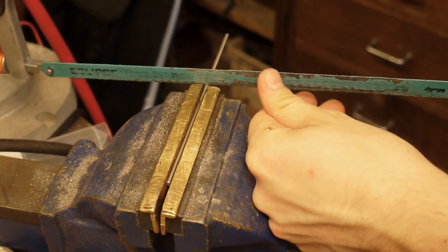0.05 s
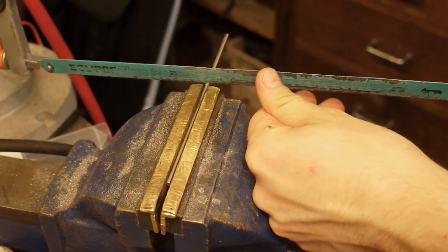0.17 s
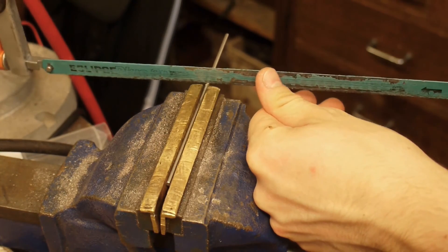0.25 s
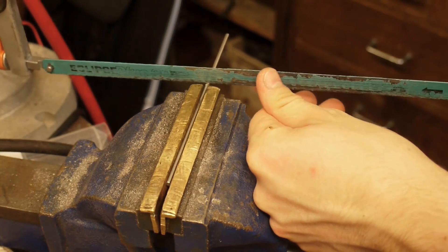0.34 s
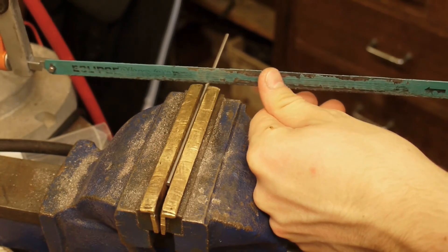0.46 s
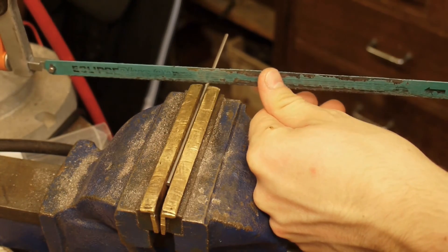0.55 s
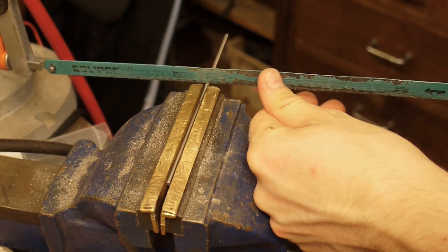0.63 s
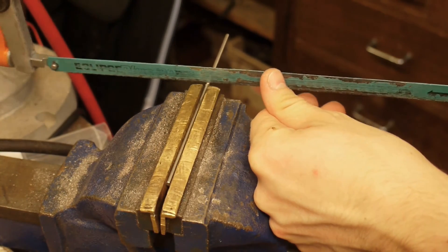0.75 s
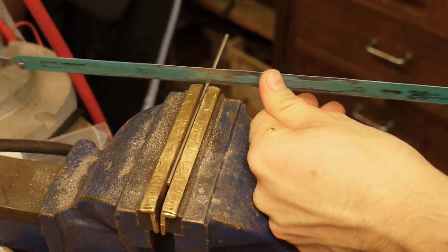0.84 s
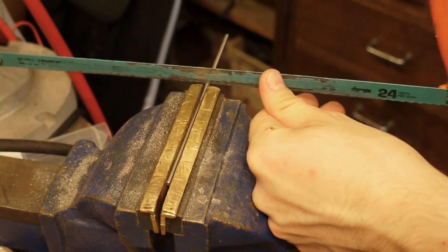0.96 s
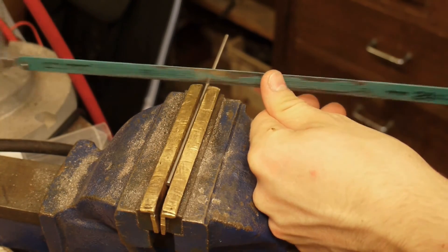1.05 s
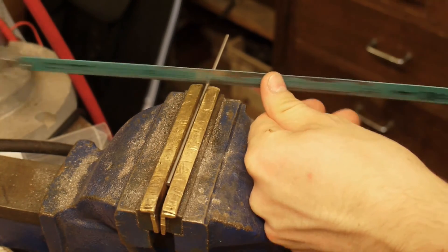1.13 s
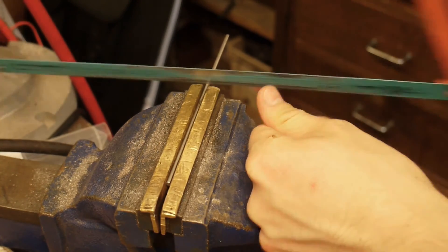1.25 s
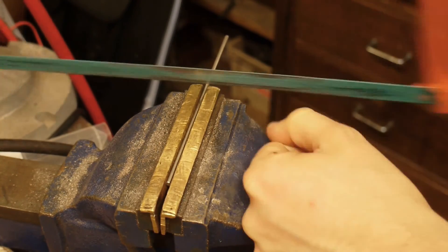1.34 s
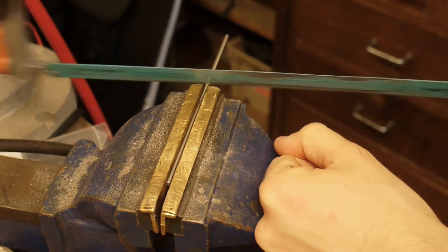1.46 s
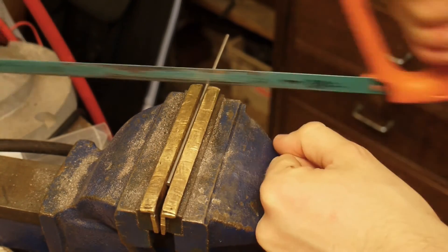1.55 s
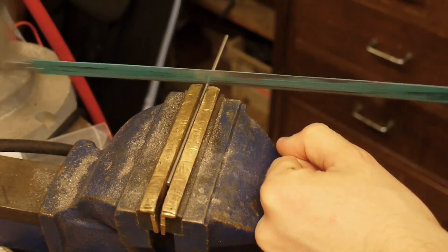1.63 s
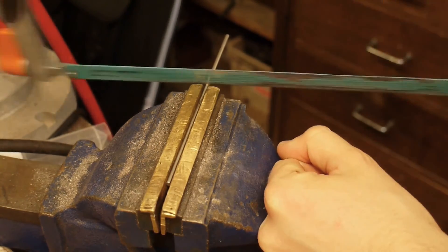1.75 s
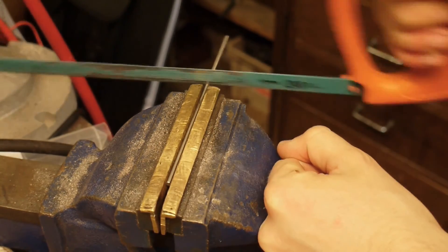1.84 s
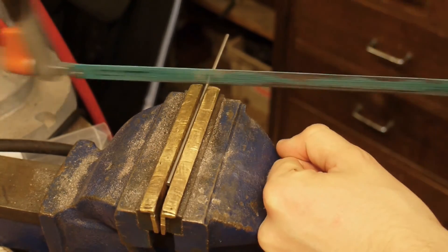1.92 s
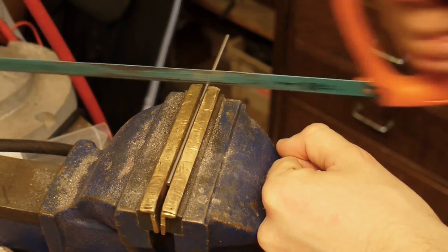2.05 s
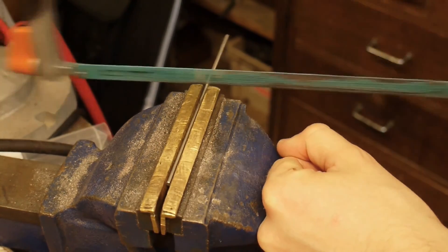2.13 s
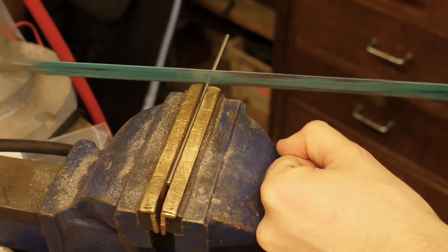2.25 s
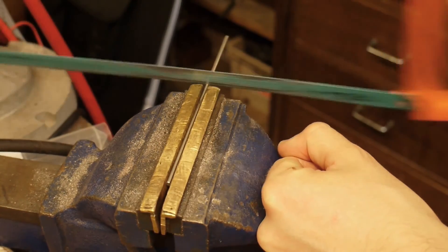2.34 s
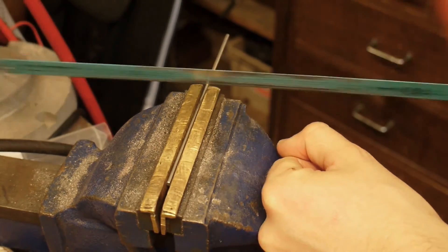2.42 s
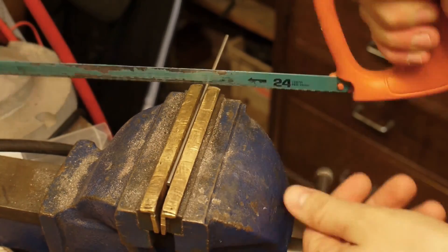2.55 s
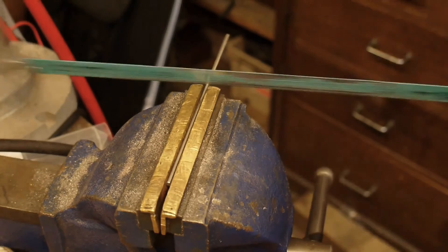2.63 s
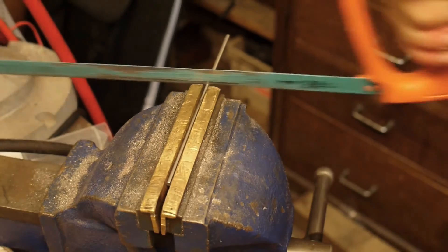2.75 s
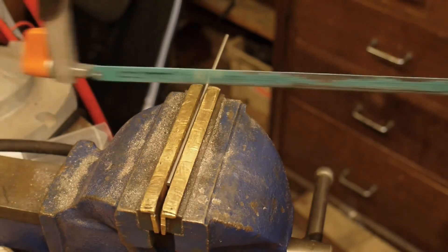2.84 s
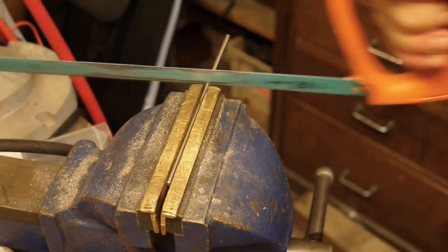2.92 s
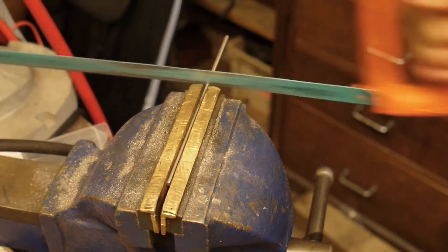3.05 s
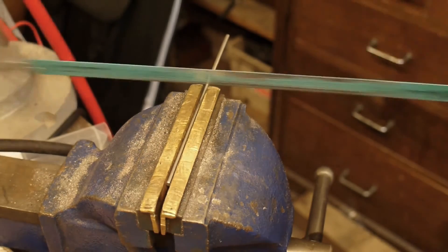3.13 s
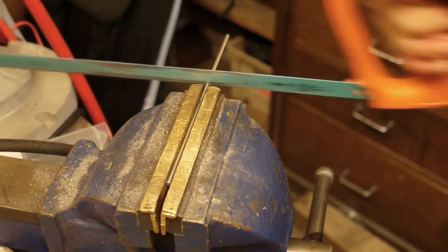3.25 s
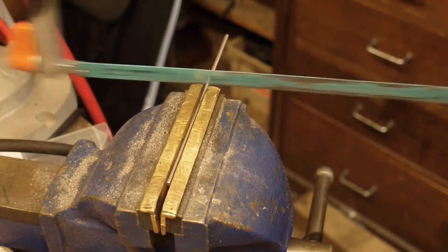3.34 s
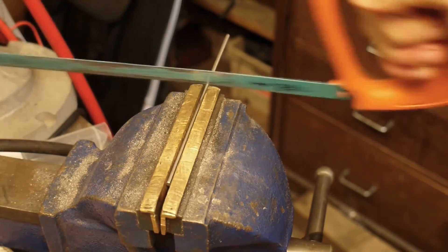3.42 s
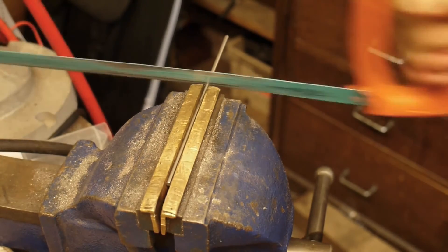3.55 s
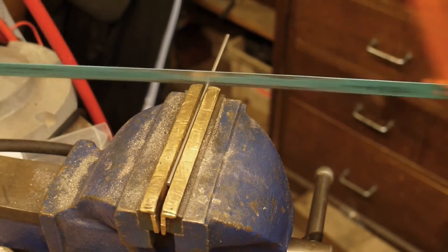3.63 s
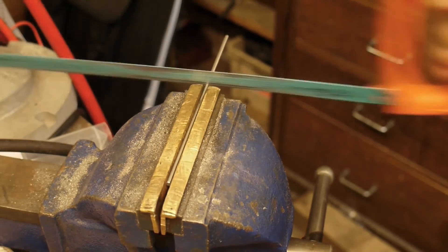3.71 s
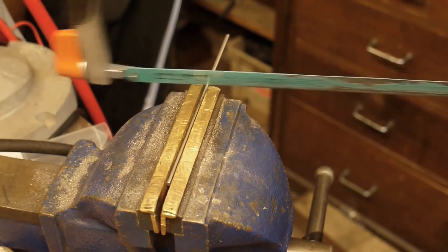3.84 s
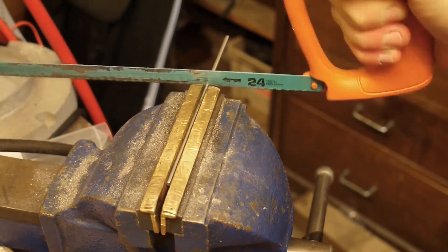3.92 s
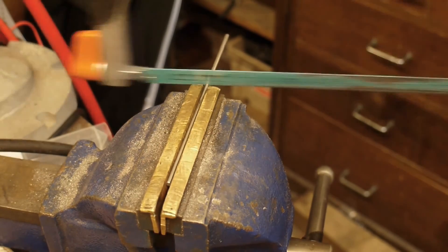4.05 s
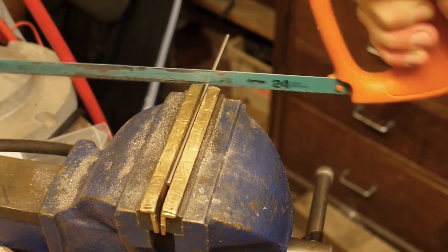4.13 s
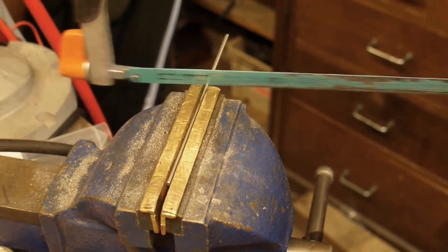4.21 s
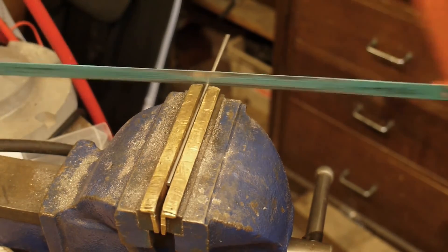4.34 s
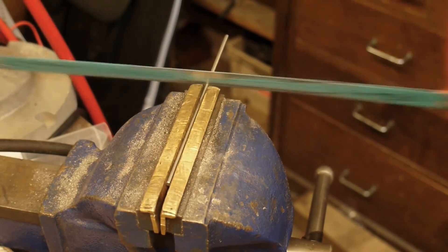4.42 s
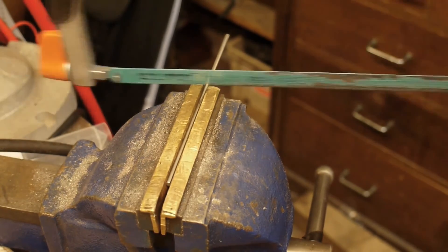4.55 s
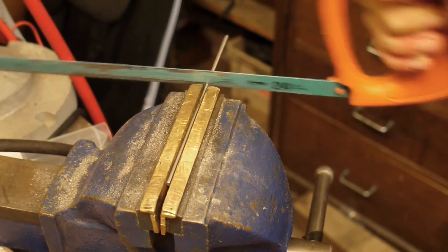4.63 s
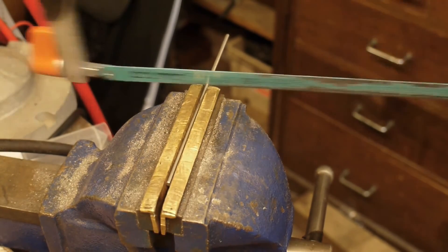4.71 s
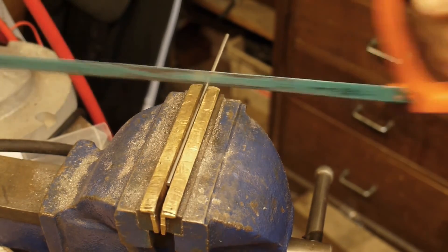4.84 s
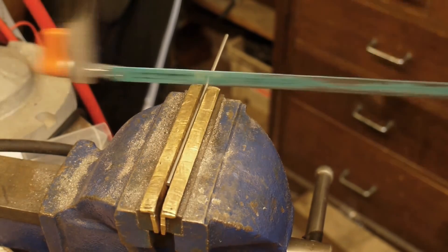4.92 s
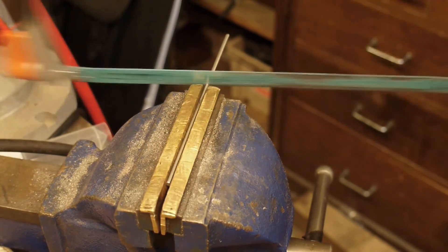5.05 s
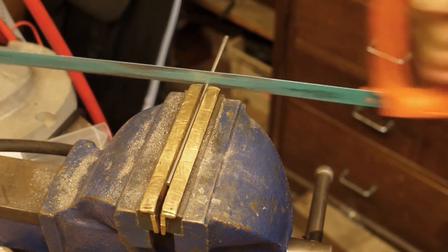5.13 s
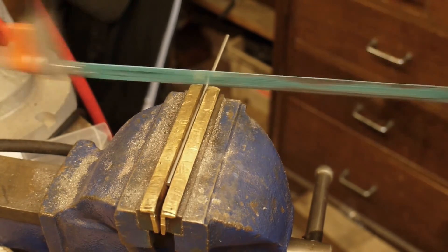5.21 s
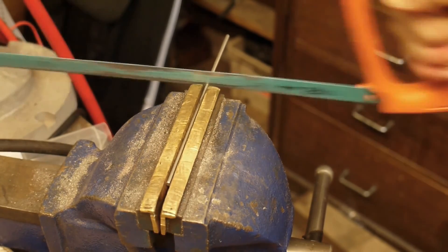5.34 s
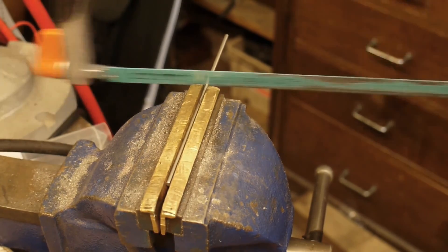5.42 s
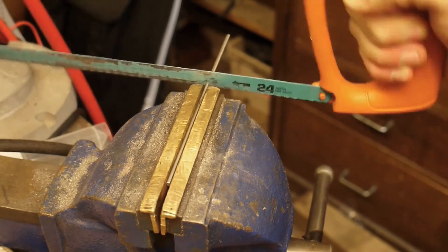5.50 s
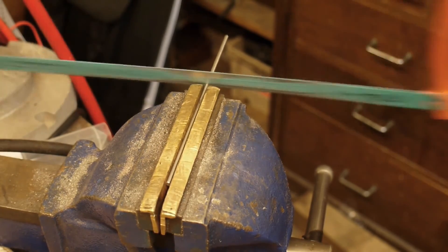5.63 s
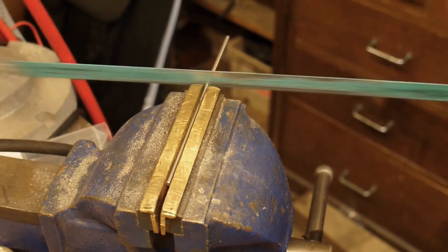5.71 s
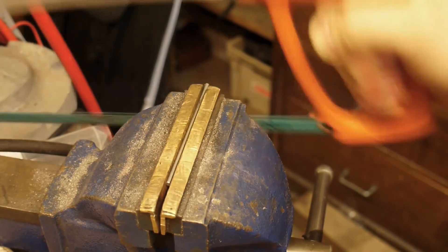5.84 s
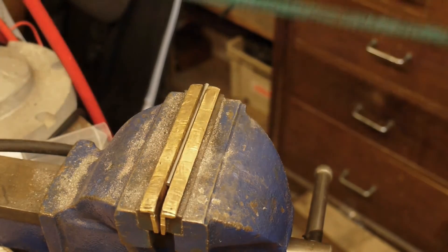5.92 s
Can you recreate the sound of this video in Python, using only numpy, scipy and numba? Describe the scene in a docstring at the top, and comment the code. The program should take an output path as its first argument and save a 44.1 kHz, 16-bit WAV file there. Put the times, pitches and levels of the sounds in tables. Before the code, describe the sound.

Metal blade clatters lightly as it is set on a clamped rod, with early hiss that stops abruptly. Tentative scrapes turn into rapid, bright sawing, longer bites alternating with lighter skims. The rod rings and squeals around the rasp, the vise thumps dully, and the saw drops with a knock. Small workshop, close microphone, nearly centred, very little reverberation.

```python
"""Clicks, then short rasping strokes, then fast sawing: a hacksaw cuts a thin clamped metal rod, heard close up.
Squeals, whines and groans come and go until the saw breaks through with a knock, over early hiss, room air and hum.
Random tooth snaps and chip scrape make a force that drives rasp, rod, blade and bench; a second, like force drives
the frame. Clicks, snags, thumps and the knock are decaying noise that sets a few modes ringing.
A small dry workshop adds short reflections."""
import sys
import numpy as np
from scipy import signal
from scipy.fft import rfft, irfft
from scipy.io import wavfile
from scipy.ndimage import uniform_filter1d, map_coordinates
from numba import njit

SR = 44100
rng = np.random.default_rng(int(sys.argv[2]) if len(sys.argv) > 2 else 0)


def file_out(sig):
    """Save sig as 16-bit WAV at sys.argv[1]."""
    # one column per channel
    cols = np.atleast_2d(sig).T
    # limit, then scale
    lim = np.clip(cols, -1, 1)
    pcm = np.round(lim * 32767).astype(np.int16)
    wavfile.write(sys.argv[1], SR, pcm)


N = 263277
T = np.arange(N) / SR  # time in seconds

# Spectrum of the early hiss. Each row: frequency in Hz, relative level in dB.
HISS_COLOUR = [(41, -44), (70, -10), (296, -5.5), (441, -6), (702, -6.5), (1200, -8), (9390, -25),
               (11200, -69), (14000, -52)]
HISS_DB, HISS_END_S = -57.5, 0.7  # the hiss stops abruptly
# Spectrum of the quiet room air. Each row: frequency in Hz, relative level in dB.
ROOM_COLOUR = [(25, 0), (100, -5.5), (180, -20), (290, -9), (1000, -20.5), (3500, -23.5), (9600, -32.5),
               (16000, -43)]
ROOM_DB = -71  # the level wanders around this
HUM_HZ, HUM_DB = 51, -67

# The blade is set down and rattles in its frame.
# Each row: start in seconds, relative level in dB, time for the driving rattle to fall 60 dB in seconds.
CLICKS = [(0.059, -28.5, 0.083), (0.0806, -37, 0.095), (0.1027, -38, 0.14), (0.1187, -31.5, 0.18),
          (0.153, -44, 0.1), (0.2747, -37.5, 0.074), (0.8305, -46, 0.6), (.841, -44, 0.2)]
# Spectrum of the clicks. Each row: frequency in Hz, relative level in dB.
CLICK_COLOUR = [(71, -42), (150, 2.5), (971, 1), (1660, 1), (2030, 2), (3400, 4), (3900, -8.5),
                (8900, -4.5), (10000, -16), (14000, -50)]
# Resonances the clicks set ringing. Each row: frequency in Hz, width in Hz, relative level in dB.
CLICK_MODES = [(1660, 32, 9.5), (1920, 50, -7), (2530, 38, 2), (3360, 60, 7.5), (4060, 70, 4)]

# Single teeth snag on the rod with a brighter tick.
# Each row: start in seconds, relative level in dB, time for the driving rattle to fall 60 dB in seconds.
SNAGS = [(0.354, -31.5, 0.18), (0.4035, -36, 0.1)]
# Spectrum of the snags. Each row: frequency in Hz, relative level in dB.
SNAG_COLOUR = [(100, -11), (400, -1.5), (1000, -6), (2400, -2), (3400, -5), (3900, -11), (8900, -2.5),
               (10000, -18), (14000, -55)]
# Resonances the snags set ringing. Each row: frequency in Hz, width in Hz, relative level in dB.
SNAG_MODES = [(1950, 44, 2), (2710, 62, 4), (4380, 43, -2), (6500, 97, 6), (8830, 72, -8)]

# The vise thumps on its bench.
# Each row: start in seconds, relative level in dB, time for the driving rattle to fall 60 dB in seconds.
THUMPS = [(.372, -57.5, 0.31), (1.727, -52, 0.069), (2.395, -53, 0.21), (2.785, -58, 0.12),
          (3.09, -52, .15), (3.385, -57, 0.19), (3.597, -50, 0.19), (3.635, -60, 0.13), (3.972, -54, .15),
          (4.843, -50, .13), (5.69, -54, .2)]
# Spectrum of the thumps. Each row: frequency in Hz, relative level in dB.
THUMP_COLOUR = [(50, -22), (110, -16), (170, -5.5), (270, 1), (400, -13), (700, -31), (3000, -55)]
# Resonances of vise and bench. Each row: frequency in Hz, width in Hz, relative level in dB.
BENCH_MODES = [(160, 53, -6.5), (192.5, 70, -5), (271.4, 35.2, 5), (333, 15, -2)]

# Short, light strokes in which the blade skims the rod and fades.
# Each row: start in seconds, length in seconds, rise in seconds, level before the fade and bites in dB.
SKIMS = [(0.771, 0.021, 0.022, -60.5), (0.828, 0.027, 0.021, -49), (0.912, 0.077, 0.078, -37.5),
         (0.989, 0.062, 0.045, -44.5), (1.055, 0.063, 0.0044, -41), (1.12, 0.075, 0.023, -42.5),
         (1.195, 0.064, 0.0026, -42), (1.267, 0.067, 0.003, -41.5), (1.331, .076, 0.013, -38.5),
         (1.708, 0.071, 0.022, -39), (1.8, 0.069, 0.026, -39), (2.121, 0.09, 0.045, -37.5),
         (2.478, 0.084, 0.022, -40.5), (2.767, 0.081, 0.026, -39.5), (2.864, 0.074, 0.017, -40),
         (3.173, 0.071, 0.025, -36.5), (3.274, 0.082, 0.036, -38), (3.363, 0.087, 0.011, -40.5),
         (3.598, 0.082, 0.042, -35.5), (3.71, 0.074, 0.016, -40.5), (3.975, 0.11, 0.04, -36.5),
         (4.218, 0.085, 0.029, -38.5), (4.677, 0.086, 0.034, -38.5), (4.765, 0.077, .013, -40),
         (5.016, .091, 0.016, -40.5), (5.113, 0.078, 0.012, -40.5), (5.413, 0.076, 0.031, -38.5),
         (5.765, 0.073, 0.028, -42.5)]
SKIM_FADE_DB = 12.5  # the pressure eases ever faster towards the end of a skim
SKIM_GLIDE_HZ = 293  # the rod's pitch rises as the pressure eases
RELEASE_S = 0.0032  # time constant as a stroke or a tone lets go
# Long strokes in which the teeth cut under full pressure.
# Each row: start in seconds, end in seconds, level before sag, wobble and bites in dB.
CUTS = [(1.404, 1.685, -40), (1.895, 2.106, -39.5), (2.244, 2.455, -39.5), (2.595, 2.738, -38.5),
        (2.945, 3.157, -40.5), (3.44, 3.577, -39), (3.785, 3.925, -39), (4.065, 4.208, -38.5),
        (4.348, 4.562, -39.5), (4.568, 4.627, -38.5), (4.837, 4.979, -40), (5.185, 5.399, -39),
        (5.536, 5.749, -39.5)]
CUT_RISE_S, CUT_SAG_DB = 0.0069, 0.56
CUT_WOBBLE_DB, CUT_WOBBLE_RATE = 1.55, 60  # spread, changes per second
# The teeth bite deeper or slip for a moment.
# Each row: middle in seconds, length in seconds, change in dB.
BITES = [(1.286, 0.027, 3.5), (1.444, 0.019, 4.5), (1.587, 0.022, 3.5), (1.719, 0.0068, 3.5),
         (2.435, 0.038, 4), (3.124, 0.023, 4), (3.983, 0.0081, 8), (4.259, 0.018, 3.5), (4.358, .012, 1),
         (4.408, 0.03, -5.5), (4.446, 0.016, 0.5), (5.222, 0.017, 2), (5.726, 0.082, 2), (5.814, .02, 11)]
# Turns at which the blade comes to rest and the rubbing dips. Each entry: time in seconds.
RESTS = [2.587, 2.75, 3.955, 4.336, 4.66, 5.0, 5.525]
# Spectrum of the rasp. Each row: frequency in Hz, relative level in dB.
RASP_COLOUR = [(300, -40.5), (600, -9), (1000, -2), (1300, 3), (1700, 3.5), (2800, 7), (4500, 6),
               (6500, 6.5), (7300, 7), (7900, 1), (10200, 1), (10700, -11), (12600, -11), (13600, -60),
               (16000, -77)]
# Resonances of the saw frame. Each row: frequency in Hz, width in Hz, relative level in dB.
FRAME_MODES = [(3080, 260, 12.5), (3400, 33, 6), (3930, 170, -0.5), (4700, 35, -5), (4913, 49, 4.5),
               (5470, 62, 6.5), (6365, 97.6, 8.5), (7000, 130, 5.5), (8350, 210, 1), (10110, 89, 4)]

# Resonances of the rod. Each row: frequency in Hz, width in Hz, relative level in dB.
ROD_MODES = [(1570, 300, -12), (1847, 33, -1), (1963, 98, 4.5), (2062, 58, 5.5), (2202, 110, 0.5),
             (2170, 120, -3), (2387, 85, 5), (2564, 20, 1)]
# The rod swings with the rasp but dies down less in a skim; ROD_HZ is its tone before drift and glide.
ROD_CUT_DB, ROD_SKIM_DB, ROD_FADE_DB, ROD_HZ = -3.5, -4.5, 6.5, 1988
# The rod breaks into a squeal. Each row: start in seconds, length in seconds, first pitch in Hz,
# last pitch in Hz (both before drift), level before fade and flutter in dB.
SQUEALS = [(0.844, 0.021, 1950, 2120, -61), (1.055, .04, 2365, 2330, -39.5), (1.19, 0.072, 2310, 2300, -47),
           (1.481, 0.057, 2070, 2180, -42), (1.631, 0.053, 2010, 2150, -37.5),
           (1.646, 0.044, 2430, 2355, -38.5), (1.81, 0.048, 2260, 2400, -46),
           (2.318, 0.042, 2057, 2060, -38), (2.327, 0.045, 2453, 2340, -41.5),
           (2.472, 0.099, 1900, 2320, -47.5), (2.592, 0.03, 1950, 1950, -40),
           (2.672, 0.046, 2290, 2366, -38.5), (2.877, 0.077, 2210, 2310, -44.5),
           (3.021, 0.051, 2324, 2120, -40.5), (3.111, 0.044, 1997, 2069, -40),
           (3.177, 0.048, 2030, 2016, -43), (3.375, 0.068, 2325, 2248, -37),
           (3.717, 0.038, 2217, 2210, -35), (4.088, 0.046, 2334, 2384, -41.5),
           (4.421, 0.068, 2211, 2180, -36), (4.766, 0.079, 2265, 2380, -42.5),
           (5.118, 0.055, 2167, 2256, -38), (5.191, 0.055, 1927, 1933, -38),
           (5.296, 0.029, 2200, 2220, -37.5), (5.659, .02, 2165, 2191, -35.5)]
SQUEAL_LOCK_DB = -31  # a squeal of this level starts to take over from the rod's loose ringing
SQUEAL_OCTAVE_DB = -17.5  # overtone, relative to the squeal

# The vise groans as it rocks under a stroke. Each row: start in seconds, length in seconds,
# middle pitch before drift in Hz, level before the fade in dB.
GROANS = [(0.928, 0.067, 249, -51), (1.054, 0.092, 332, -57), (1.223, 0.034, 255, -52.5),
          (1.341, .07, 337, -54), (2.154, .065, 334, -52.5), (2.91, 0.048, 344, -58),
          (3.198, .05, 328.5, -54.5), (3.531, 0.06, 342, -61), (4.085, 0.073, 314, -54),
          (4.271, 0.046, 314, -52), (4.78, 0.055, 323.8, -52.5)]
GROAN_GLIDE_HZ = 22  # rise over each groan
RUMBLE_DB = -60.5  # bench rumble while the blade slides

# The blade whines as the teeth chatter along the rod. Each row: start in seconds, length in seconds,
# first pitch in Hz, last pitch in Hz (both before drift), level before the fade in dB.
WHINES = [(1.128, 0.078, 820, 790, -52), (1.265, 0.055, 637, 666, -50.5), (1.367, 0.078, 656, 737, -54.5),
          (1.432, 0.029, 690, 644, -45.5), (1.468, 0.063, 780, 832, -53), (1.969, 0.063, 866, 890, -50.5),
          (2.061, 0.043, 680.5, 795, -49), (2.254, 0.026, 909, 859, -51), (2.311, 0.079, 947, 988.7, -54),
          (2.4, 0.036, 655, 706, -53), (2.531, 0.068, 685, 684, -54.5), (2.694, 0.048, 675, 850, -52),
          (2.887, 0.036, 729.4, 673.7, -52.5), (2.943, 0.064, 860, 845, -50),
          (3.027, 0.055, 1114, 1060, -55), (3.092, 0.03045, 636.6, 672.5, -47.5),
          (3.117, 0.039, 752.6, 840, -49.5), (3.392, 0.046, 701.2, 650, -52),
          (4.15, 0.044, 732, 820.5, -52), (4.625, 0.027, 677.6, 650, -47),
          (4.768, 0.061, 980, 877.7, -47.5), (4.857, 0.036, 810, 850, -46.5),
          (5.15, 0.038, 673.2, 656, -48.5), (5.459, 0.034, 664, 649, -46)]
# Resonances of the blade. Each row: frequency in Hz, width in Hz, relative level in dB.
BLADE_MODES = [(672, 41, -0.5), (804, 87, -5), (903, 60, -7), (1063, 78, -8), (1365, 590, 2.5)]

# The saw breaks through and drops on the jaws.
# Each row: start in seconds, relative level in dB, time for the driving rattle to fall 60 dB in seconds.
KNOCKS = [(5.8438, -28.5, 0.16)]
# Spectrum of the knock. Each row: frequency in Hz, relative level in dB.
KNOCK_COLOUR = [(53, -48), (90, -32), (160, -18), (311, -2.5), (550, -14), (800, -7), (1270, -11),
                (1650, -3), (2110, -9), (2600, -11), (3600, -10), (9570, -13.5), (15000, -47)]
# Resonances the knock sets ringing. Each row: frequency in Hz, width in Hz, relative level in dB.
KNOCK_MODES = [(330, 33, -4), (736, 67, 3.5), (1151, 27.4, 1), (1740, 77, -4), (1960, 34, -2),
               (2286, 49, -4), (2470, 150, -1)]
KNOCK_DAMPED_S = (5.88, 5.905)  # the hand stills the saw between these times


def undb(db):
    """Decibels to gain."""
    return 10 ** (np.asarray(db) / 20)


def unit(x):
    """Scale to rms 1."""
    return x / np.sqrt(np.mean(x ** 2))


def even(x, span_s):
    """Hold the rms near 1 over each short span, keeping the finer grain."""
    power = np.abs(uniform_filter1d(x ** 2, int(span_s * SR) + 1))
    return x / np.sqrt(power + 1e-12 * np.mean(x ** 2))


def walk(rate):
    """Random wander of rms 1 that takes a new direction rate times a second."""
    return unit(np.interp(T * rate, np.arange(N // 8), rng.standard_normal(N // 8)))


def colour(x, points):
    """Causal minimum-phase filter with the given (Hz, dB) response."""
    hz, db = np.transpose(points)
    grid = np.linspace(1, SR / 2, 1025)
    response_db = np.interp(np.log(grid), np.log(hz), db)
    # fold the cepstrum forward in time
    cepstrum = irfft(np.log(undb(response_db)))
    half = len(cepstrum) // 2
    cepstrum[1:half] *= 2
    cepstrum[half + 1:] = 0
    impulse = irfft(np.exp(rfft(cepstrum)))
    return signal.fftconvolve(x, impulse)[:N]


@njit
def svf(x, hz, width):
    """State-variable band-pass with a moving centre and a width in Hz."""
    y, band, low = np.empty(len(x)), 0., 0.
    for i in range(len(x)):
        g = np.tan(np.pi * hz[i] / SR)
        damping = width / hz[i]
        v = (band + g * (x[i] - low)) / (1 + g * (g + damping))
        band = 2 * v - band
        low = low + 2 * g * v
        y[i] = damping * v
    return y


def band_pass(x, hz, width_hz):
    """Fixed resonance with one centre."""
    return svf(x, np.full(N, float(hz)), float(width_hz))


def ring(x, modes, patchy_db=0, patchy_rate=14):
    """Sum of resonances; each can come and go as the point of contact shifts."""
    total = np.zeros(N)
    for hz, width_hz, db in modes:
        gain = undb(db + patchy_db * walk(patchy_rate))
        total += gain * band_pass(x, hz, width_hz)
    return unit(total)


def sing(x, hz, width_hz):
    """One steep, moving resonance: two equal band-passes in a row."""
    once = svf(x, hz, float(width_hz))
    return unit(svf(once, hz, float(width_hz)))


def blows(rows, points, modes, ring_db, crack_db, crack_s):
    """Metal on metal: a short crack and a dense rattle that sets a few modes ringing."""
    envelope = np.zeros(N)
    for start, db, t60 in rows:
        age = np.maximum(T - start, 0)
        rattle = np.exp(-np.log(1000) * age / t60)
        crack = undb(crack_db) * np.exp(-age / crack_s)
        envelope += (T >= start) * undb(db) * (rattle + crack)
    white = rng.standard_normal(N)
    hit = colour(white * envelope, points) / np.std(colour(white, points))
    return hit + undb(ring_db) * np.std(hit) * ring(white * envelope, modes)


def stroke(start, length, rise_s, db, fade_db):
    """Amplitude of one stroke: it grips, eases off along an arch and lets go."""
    out = np.zeros(N)
    span = slice(int(start * SR), int((start + length + 10 * RELEASE_S) * SR))
    age = T[span] - start
    grip = np.clip(age / max(rise_s, .002), 0, 1)
    release = np.exp(-np.maximum(age - length, 0) / RELEASE_S)
    arch_db = fade_db * np.minimum(age / length, 1) ** 2
    out[span] = grip * release * undb(db - arch_db)
    return out


def tones(force, rows, width_hz, waver, rise_s, fade_db, steady_s):
    """Short gliding tones: the tooth forces drive one narrow resonance for each row."""
    out = np.zeros(N)
    drift = np.exp(waver * walk(40))
    for start, length, first_hz, last_hz, db in rows:
        # a margin lets the resonance build up and die away
        span = slice(int((start - .04) * SR), int((start + length + .04) * SR))
        pitch = np.interp(T[span], [start, start + length], [first_hz, last_hz]) * drift[span]
        tone = even(sing(force[span], pitch, width_hz), steady_s)
        out[span] += tone * stroke(start, length, rise_s, db, fade_db)[span]
    return out


def background():
    """Early hiss and wandering room air, both coloured noise, and a sine of mains hum."""
    hiss = unit(colour(rng.standard_normal(N), HISS_COLOUR)) * undb(HISS_DB) * (T < HISS_END_S)
    air = unit(colour(rng.standard_normal(N), ROOM_COLOUR)) * undb(ROOM_DB + walk(9.8))
    hum = undb(HUM_DB) * unit(np.sin(2 * np.pi * HUM_HZ * T))
    return hiss + air + hum


def clicks():
    """The blade is set down: small blows ring as it rattles in its frame."""
    return undb(-17.5) * blows(CLICKS, CLICK_COLOUR, CLICK_MODES, ring_db=-3.5, crack_db=-8.0, crack_s=0.002)


def snags():
    """Single teeth snag on the rod: a sharp crack leads a bright ring."""
    return undb(-15.5) * blows(SNAGS, SNAG_COLOUR, SNAG_MODES, ring_db=-8.0, crack_db=8.5, crack_s=0.0013)


def thumps():
    """The vise thumps on its bench: dull blows excite the low bench modes."""
    return blows(THUMPS, THUMP_COLOUR, BENCH_MODES, ring_db=-6.5, crack_db=-13, crack_s=0.0071)


def sawing():
    """Amplitudes of rasp and rod, the rod's pitch and blade speed (0-1) that follow from the strokes."""
    # strokes add as power
    cut = sum(stroke(start, end - start, CUT_RISE_S, db, CUT_SAG_DB) ** 2 for start, end, db in CUTS)
    cut = cut * undb(CUT_WOBBLE_DB * walk(CUT_WOBBLE_RATE)) ** 2
    skim = sum(stroke(*row, SKIM_FADE_DB) ** 2 for row in SKIMS)
    bite_db = sum(db * np.exp(-2 * ((T - middle) / length) ** 2) for middle, length, db in BITES)
    rasp_gain = np.sqrt(cut + skim) * undb(bite_db)
    rod_skim = sum(stroke(*row, ROD_FADE_DB) ** 2 for row in SKIMS)
    rod_gain = np.sqrt(cut * undb(ROD_CUT_DB) ** 2 + rod_skim * undb(ROD_SKIM_DB) ** 2)
    rod_hz = np.full(N, float(ROD_HZ))
    for start, length, *_ in SKIMS:
        span = slice(int(start * SR), int((start + length) * SR))
        rod_hz[span] += SKIM_GLIDE_HZ * ((T[span] - start) / length) ** 2
    # the blade is fastest in the middle of each stroke
    spans = [(start, end) for start, end, _ in CUTS]
    spans += [(start, start + length) for start, length, *_ in SKIMS]
    speed = sum(np.interp(T, [start, (start + end) / 2, end], [0, 1, 0]) for start, end in spans)
    return rasp_gain, rod_gain, rod_hz, speed


def teeth(speed, slow_hz=700, fast_hz=1700, scatter_db=9.5, scrape_db=0, chatter_db=2.5,
          chatter_rate=450, shear=1.87):
    """Teeth snap past the rod, each with its own force; chips scrape between."""
    # the tooth rate follows blade speed, with jitter
    hz = (slow_hz + (fast_hz - slow_hz) * speed) * np.exp(.16 * walk(1200))
    phase = np.cumsum(hz) / SR
    passing = np.diff(np.floor(phase), prepend=0)
    snaps = passing * undb(scatter_db * rng.standard_normal(N)) / np.sqrt(hz)
    scrape = rng.standard_normal(N) * np.exp(-(phase % 1) / 0.53)
    contact = unit(snaps) + undb(scrape_db) * unit(scrape)
    # the blade bounces in the cut, so the contact force flutters
    force = unit(contact * undb(chatter_db * walk(chatter_rate)))
    # a chip shears off before the force can grow without bound
    return even(shear * np.tanh(force / shear), 0.04)


def along_blade(x, trip_s=0.002613, echo=0.27):
    """Waves return from both ends of the blade; as it slides, one path grows and the other shrinks."""
    place = .5 + 0.363 * np.tanh(0.552 * walk(9))
    returns = sum(map_coordinates(x, [(T - trip_s * part) * SR], order=3) for part in (place, 1 - place))
    return unit(x + echo * returns)


def rasp_sound(force, speed, flicker_db=3, burst_db=0.5):
    """The coloured tooth force plus frame resonances driven by a second one; bursts and a flickering treble."""
    frame_drive = band_pass(teeth(speed), 5500, 2600)
    frame = even(ring(frame_drive, FRAME_MODES, patchy_db=7.0), 0.022)
    rasp = unit(colour(force, RASP_COLOUR)) * undb(-0.17) + undb(-4.0) * frame
    # chips tear off in uneven bursts
    rasp = rasp * undb(burst_db * walk(190))
    high_pass = signal.butter(4, 8500, "high", fs=SR, output="sos")
    treble = signal.sosfiltfilt(high_pass, rasp)
    return rasp + treble * (undb(flicker_db * walk(70)) - 1)


def rod(force, gain, hz, tone_db=-7.5, body_db=0.0, flutter_db=3.0):
    """The rod rings in its modes and in one tone that rises through each skim; at times it locks into a squeal."""
    tone = even(sing(force, hz * np.exp(0.034 * walk(30)), 100), 0.015)
    body = even(ring(band_pass(force, 2150, 1300), ROD_MODES, patchy_db=2.0), 0.018)
    squeals = tones(force, SQUEALS, width_hz=116, waver=0.0051, rise_s=0.0085, fade_db=1.0, steady_s=0.013)
    squeals = signal.hilbert(undb(flutter_db * walk(220)) * squeals)
    size = np.abs(squeals)
    # doubling the phase gives the octave
    octave = undb(SQUEAL_OCTAVE_DB) * size * np.cos(2 * np.angle(squeals))
    loose = gain / np.hypot(1, size / undb(SQUEAL_LOCK_DB))
    return loose * (undb(tone_db) * tone + undb(body_db) * body) + squeals.real + octave


def bench(force):
    """The vise rumbles on its bench and groans in short rising tones."""
    rumble = even(ring(band_pass(force, 260, 192), BENCH_MODES, patchy_db=5.5), 0.088)
    half_glide = GROAN_GLIDE_HZ / 2
    rows = [(start, length, hz - half_glide, hz + half_glide, db) for start, length, hz, db in GROANS]
    groans = tones(force, rows, width_hz=22, waver=0.012, rise_s=0.017, fade_db=4.5, steady_s=0.026)
    return undb(RUMBLE_DB) * rumble + groans


def blade(force, gain, drone_db=-14.0, slide_db=-59):
    """The blade drones with the cutting force and breaks into short gliding whines."""
    whines = tones(force, WHINES, width_hz=52, waver=0.01, rise_s=0.012, fade_db=1.5, steady_s=0.019)
    modes = ring(band_pass(force, 900, 400), BLADE_MODES, patchy_db=5.0, patchy_rate=20)
    return whines + even(modes, 0.06) * np.hypot(gain * undb(drone_db), undb(slide_db))


def saw(rub_db=-58, rod_rub_db=-55, rest_db=-10, rest_s=0.0089):
    """One tooth force is heard as rasp and through rod, blade and bench; a second sounds the frame in the rasp."""
    rasp_gain, rod_gain, rod_hz, speed = sawing()
    # between strokes the blade still rubs lightly in the slot, less so at its rests
    resting = sum(np.exp(-((T - turn) / rest_s) ** 2) for turn in RESTS)
    sliding = np.interp(T, [.9, .95, 5.84, 5.88], [0, 1, 1, 0]) * undb(rest_db * resting)
    rasp_gain = np.hypot(rasp_gain, undb(rub_db) * sliding)
    rod_gain = np.hypot(rod_gain, undb(rod_rub_db) * sliding)
    force = along_blade(teeth(speed))
    rasp = rasp_sound(force, speed) * rasp_gain
    return rasp + rod(force, rod_gain, rod_hz) + sliding * (blade(force, rasp_gain) + bench(force))


def knock():
    """The saw drops on the jaws: a hard crack and a ring that the hand damps by 12 dB."""
    hit = blows(KNOCKS, KNOCK_COLOUR, KNOCK_MODES, ring_db=-6.0, crack_db=6.5, crack_s=0.002)
    return undb(-8.0) * hit * undb(np.interp(T, KNOCK_DAMPED_S, [0, -12]))


def workshop(x, t60):
    """Short diffuse reflections from bench and drawers: decaying noise after a 3 ms gap."""
    t = T[:SR // 3]
    response = rng.standard_normal(len(t)) * np.exp(-np.log(1000) * t / t60) * (t > .003)
    return signal.fftconvolve(x, response / np.linalg.norm(response))[:N]


def scene():
    """Everything sits in the centre, with a trace of width in the treble."""
    direct = clicks() + snags() + thumps() + saw() + knock()
    mid = direct + undb(-11.0) * workshop(direct, t60=0.045) + background()
    side_colour = [(1300, -46), (1950, -43.5), (5000, -31.5), (8000, -42.5), (12000, -25.5)]  # (Hz, dB)
    side = colour(workshop(mid, t60=0.01), side_colour)
    side = side * undb(1.1 * walk(40))
    return np.array([mid + side, mid - side])


def record(dry):
    """A steep elliptic low-pass cuts the top above 15.8 kHz."""
    low_pass = signal.ellip(8, .2, 70, 15800, fs=SR, output="sos")
    return signal.sosfilt(low_pass, dry)


dry = scene()
out = record(dry)
file_out(out)
```